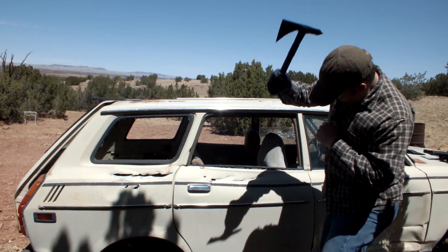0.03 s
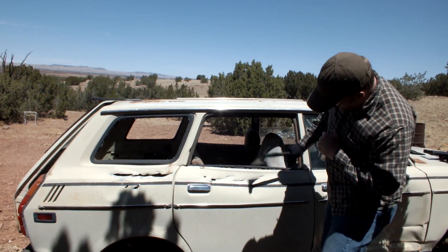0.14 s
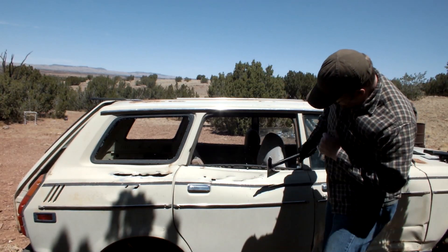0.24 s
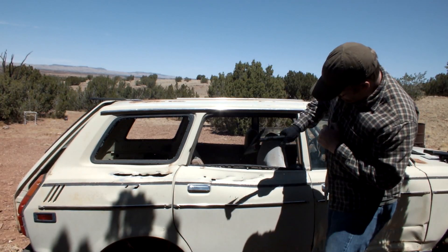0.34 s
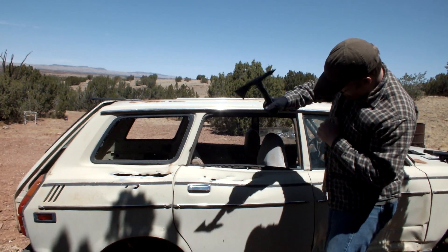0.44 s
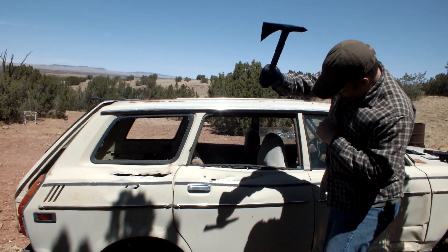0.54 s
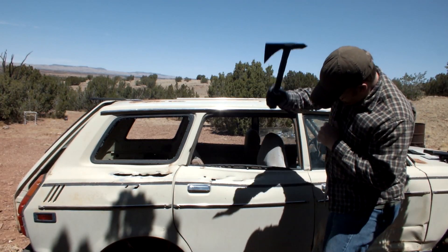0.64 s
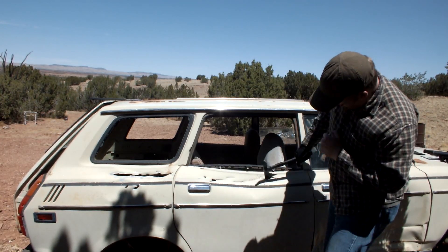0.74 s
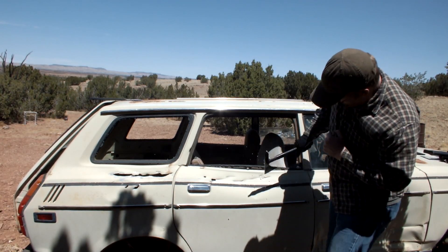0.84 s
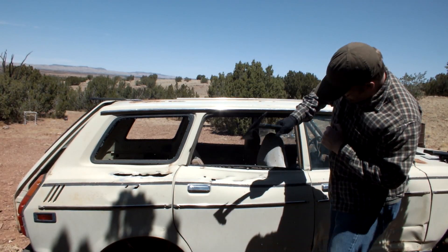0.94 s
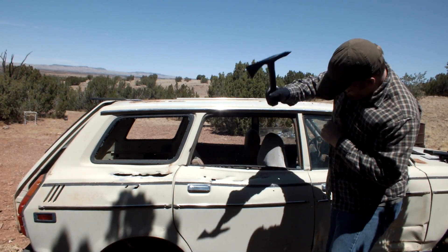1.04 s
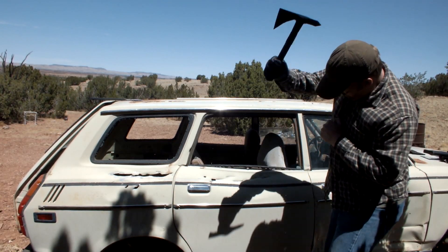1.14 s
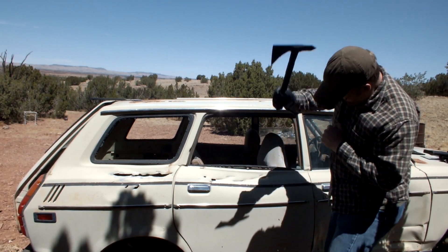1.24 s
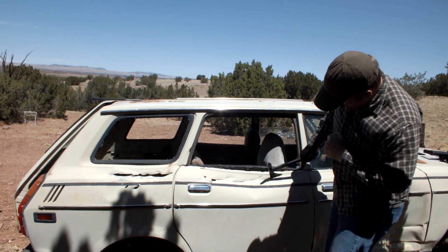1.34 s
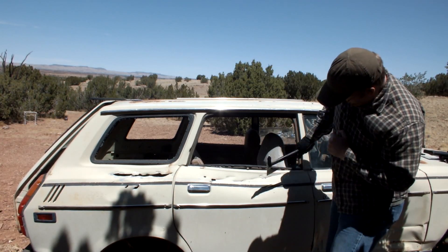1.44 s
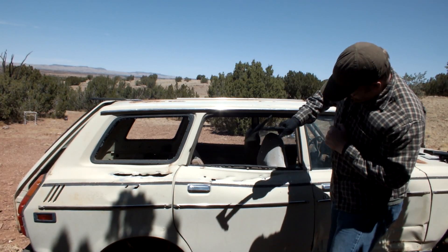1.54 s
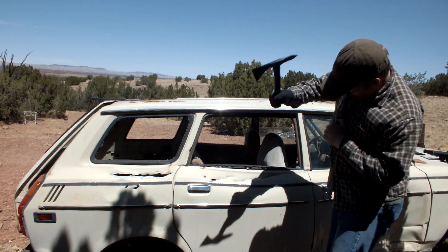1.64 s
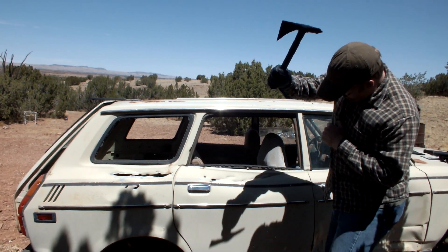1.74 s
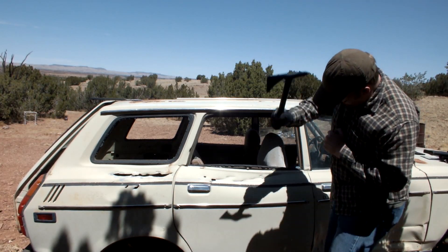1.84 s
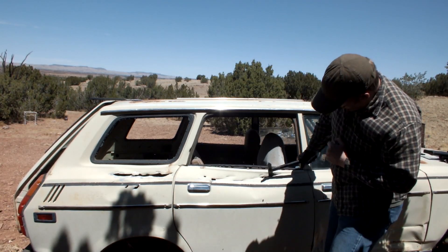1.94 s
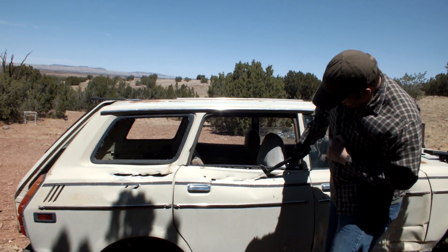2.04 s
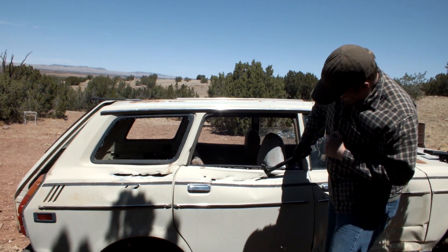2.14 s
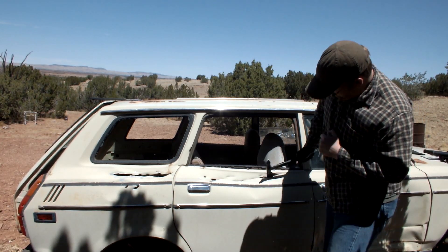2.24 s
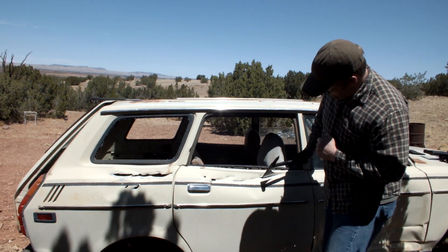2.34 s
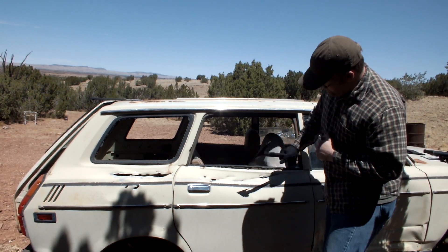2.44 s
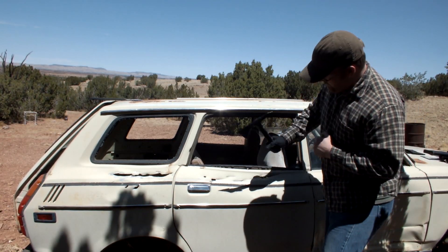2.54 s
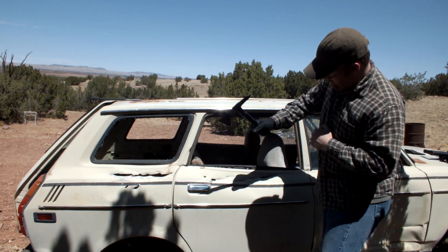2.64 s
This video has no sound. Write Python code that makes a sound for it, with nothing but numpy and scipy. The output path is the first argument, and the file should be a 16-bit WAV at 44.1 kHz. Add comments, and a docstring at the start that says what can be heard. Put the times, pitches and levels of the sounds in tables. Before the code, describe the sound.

An axe hits a car's broken side window four times at a steady pace, each a sharp crack and hollow sheet-metal rattle, with glass snapping and crunching between blows; close microphone, quiet open outdoors.

```python
"""A tomahawk chops four times into the broken side window of an old car, outdoors.
Each blow is a coloured noise crack and a sine thump; banded noise rattles and sine modes ring the hollow door.
Glass snaps as clicks with treble modes, cracks and crunches as short grains and tinkles as beating sines.
Soft thuds and short rings are the blade bumping the window frame; faint coloured noise is the still air.
"""
import sys
import numpy as np
from scipy import signal
from scipy.fft import rfft, irfft
from scipy.io import wavfile
from scipy.ndimage import uniform_filter1d

SR = 44100
rng = np.random.default_rng(int(sys.argv[2]) if len(sys.argv) > 2 else 0)


def persist_wave(psi):
    """Save psi, clipped to +-1, as 16-bit WAV."""
    counts = np.round(np.clip(psi, -1, 1) * 32767).astype(np.int16)
    wavfile.write(sys.argv[1], SR, np.atleast_2d(counts).T)


N = 119070

# axe blows and how the door answers each: t/s, crack level/dB, door level/dB, crack treble/dB, thump f/Hz,
# thump level/dB, favoured door f/Hz, level recovery/s, door ring length (factor)
BLOW_TABLE = [(0.2131, 1, -1, -1, 183, -13.5, 260, 0.1, 0.71),
              (0.7964, -1.5, -1, 2, 420, -12.5, 365, 0.095, 0.97),
              (1.3988, 0.5, -2, -2, 400, -14.5, 74, 0.073, 0.99),
              (1.9762, -2, -1, 5, 764, -16, 192, 0.083, 0.99)]
# colour of breaking glass: f/Hz, level/dB
GLASS_COLOUR = [(80, -24), (250, -15.5), (600, -2), (1100, 1), (2200, 1), (4000, -3.5), (5500, -10.5),
                (8500, -15), (12000, -26.5), (15000, -26.5)]

BODY_HZ, TREBLE_HZ = 765, 4800  # corners of the tone shelves
GLASS_TAIL_DB, GLASS_TAIL_T60_S = -25, 0.45  # weaker scatter behind every glass contact


def undb(db):
    """Turn decibels into an amplitude factor."""
    return 10 ** (np.asarray(db) / 20)


def unit(x):
    """Scale to an energy of one, averaged over the channels."""
    return x / np.sqrt(np.mean(np.sum(x ** 2, axis=-1)) + 1e-18)


def freqs():
    """Frequencies in Hz of the full-length spectrum, kept at or above 1 Hz."""
    return np.maximum(np.arange(N // 2 + 1) * SR / N, 1)


def curve(points):
    """Draw a level in dB at every frequency, through points on a log frequency axis."""
    hz, db = np.array(points).T
    return np.interp(np.log(freqs()), np.log(hz), db)


def treble():
    """Shelf from 0 in the bass to 1 in the treble."""
    return 1 / (1 + (TREBLE_HZ / freqs()) ** 4)


def colour(x, db):
    """Filter with the given dB curve, causal (minimum phase) and of unit energy."""
    cepstrum = irfft(np.log(undb(db)), N)
    # folding the cepstrum forward in time makes the filter causal
    cepstrum[1:N // 2] *= 2
    cepstrum[N // 2 + 1:] = 0
    impulse = irfft(np.exp(rfft(cepstrum)), N)
    impulse = unit(impulse[:N // 16])
    return signal.fftconvolve(x, impulse[None], axes=-1)[:, :x.shape[-1]]


def noise(n):
    """Stereo noise: alike in the bass, more and more unrelated in the treble."""
    wide_hz = 4100
    f = np.arange(n // 2 + 1) * SR / n
    mid, side = rfft(rng.standard_normal((2, n)))
    spread = (f / wide_hz) ** 1.3
    side_share = .5 * spread / (1 + spread)
    opposite = np.array([[1], [-1]])
    return irfft(mid * np.sqrt(1 - side_share) + side * np.sqrt(side_share) * opposite, n)


def clock():
    """Time axis of one event, in seconds."""
    return np.arange(2 ** 15) / SR


def fade(t, t60):
    """Exponential decay that falls 60 dB in t60 seconds, flat before t = 0."""
    return np.exp(-np.log(1000) * np.maximum(t, 0) / max(t60, 1e-3))


def add(out, s, x):
    """Mix x in at s seconds."""
    i = max(int(s * SR), 0)
    out[:, i:i + x.shape[-1]] += x[..., :max(N - i, 0)]


def contact(sharp, t60, tail_db, tail_t60):
    """A hard click, its quick scatter and a weaker tail from the car's cabin."""
    t = clock()
    envelope = fade(t, t60) + undb(tail_db) * fade(t, tail_t60)
    x = unit(noise(len(t)) * envelope)
    x[:, 0] += sharp
    return unit(x)


def blows():
    """The axe lands: a crack and a short thump of the struck spot, then the door rattles and rings."""
    # colour of the crack of the blade on the sill: f/Hz, level/dB
    crack_colour = [(40, -32), (140, 0), (400, 0.5), (850, 1), (1600, 0.5), (2600, -5), (4200, -3.5),
                    (5500, -13), (9000, -19.5), (15000, -33)]
    out, t = np.zeros((2, N)), clock()
    for (s, crack_db, door_db, treble_db, thump_hz, thump_db,
         favoured_hz, recovery_s, ring) in BLOW_TABLE:
        click = contact(sharp=0.57, t60=0.014, tail_db=-17, tail_t60=0.12)
        crack = unit(colour(click, curve(crack_colour) + treble_db * treble()))
        thump = undb(thump_db) * fade(t, t60=0.12) * np.sin(2 * np.pi * thump_hz * t)
        answer = rattle() + door(favoured_hz, recovery_s, ring)
        add(out, s, undb(17 + crack_db) * crack + thump + undb(door_db) * answer)
    return out


def rattle():
    """Door and loose glass chatter unevenly, hold briefly, then die away band by band."""
    # overlapping noise bands of the rattle: f/Hz, level/dB, hold/s, t60/s
    bands = [(42, -44.5, 0.11, 0.6), (101, -35, 0.12, 0.7), (204, -35.5, 0.17, 0.44),
             (336, -29.5, 0.15, 0.32), (433, -26, 0.092, 0.4), (820, -28.5, 0.038, 0.46),
             (1400, -31, 0.04, 0.67), (2410, -33.5, 0.048, 0.6), (4440, -44.5, 0.08, 0.51),
             (5200, -45.5, 0.054, 0.61), (9500, -47.5, 0.032, 0.43), (14800, -60, 0.03, .5)]
    rough_db, rise_cycles = 2.2, 0.48  # RMS of the level flutter; time constant of the rise
    t = clock()
    log_f = np.log(np.maximum(np.arange(len(t) // 2 + 1) * SR / len(t), 1))
    log_centres = np.log([row[0] for row in bands])
    hiss = rfft(noise(len(t)))
    flutter = uniform_filter1d(rng.standard_normal(len(t)), size=160)
    chatter = undb(rough_db * flutter / flutter.std())
    out = 0
    for weights, (hz, db, hold, t60) in zip(np.eye(len(bands)), bands):
        band = irfft(hiss * np.interp(log_f, log_centres, weights))
        rise = 1 - np.exp(-t * hz / rise_cycles)
        envelope = rise * fade(t - hold, t60)
        if hz > BODY_HZ:
            envelope = envelope * chatter
        out = out + band / band.std() * undb(db) * envelope
    return out


def door(favoured_hz, recovery_s, ring):
    """Sheet-metal modes, some favoured, rise as the recorder's gain recovers, then ring out, scaled by ring."""
    # modes of the door before detuning, favouring and ring scaling: f/Hz, level/dB, t60/s
    modes = [(67.56, -24, 0.71), (167.2, -27, 0.58), (224.3, -25.5, 0.48), (245, -25, 0.55),
             (276.7, -26, 0.48), (343, -28.5, 0.26), (416, -21.5, 0.21), (445, -29, 0.36), (522, -27, 0.21),
             (630, -36.5, 0.2), (750, -32, 0.35), (938, -34.5, 0.34)]
    favour_db, favour_octaves = 2.5, 0.17  # the struck spot favours modes near favoured_hz
    start = .18  # share of the full level present at the blow
    t = clock()
    recovery = np.minimum(start + (1 - start) * (t / recovery_s) ** 2, 1)
    out = 0
    for hz, db, t60 in modes:
        detune, phase = rng.standard_normal(2)
        octaves_off = np.log2(hz / favoured_hz)
        favour = favour_db * np.exp(-.5 * (octaves_off / favour_octaves) ** 2)
        tone = np.sin(2 * np.pi * (hz * (1 + 0.00895 * detune) * t + phase))
        out = out + undb(db + favour) * fade(t - recovery_s, ring * t60) * tone
    return recovery * out


def snaps():
    """Pieces of glass break off or land: a click and splinter modes, each with its own ring."""
    # glass snapping: t/s, level/dB, ring f/Hz, ring boost/dB, body shelf/dB, treble shelf/dB, t60/s
    pieces = [(.014, -18.5, 1260, 3, 8, 17.5, 0.088), (0.0973, -23, 2540, 3, -1, 8.5, 0.11),
              (0.2232, -13.5, 1500, 19, -1, 30, 0.017), (0.2339, 1, 1450, 5, -6, -11, 0.029),
              (0.3615, -8, 1200, 5, 20, -3.5, 0.071), (0.415, -2, 3180, 6, -1, -1.5, 0.069),
              (0.53, -4, 2570, 1.5, -6, 4.5, 0.061), (0.6636, 0.5, 1320, 3, 1, 2.5, 0.092),
              (.672, -11, 3320, 5, 7, -9, 0.17), (.772, -3, 1300, 6.5, -5, 4.5, 0.073),
              (0.982, -15, 2320, 4, -23, -12, 0.061), (1.129, -14.5, 2240, 12, -11, -7.5, 0.063),
              (1.29, -12.5, 3750, 3, 3, 10, 0.1), (1.3109, -8, 1930, 2, -3, 0, 0.13),
              (1.3373, -6, 1870, 1, 6, -1, 0.064), (1.586, -5.5, 1370, 6, -5, 15, 0.032),
              (1.643, -10, 3700, 5.5, -15, 1, 0.032), (1.724, -15.5, 3350, 13, -44, 12, 0.11),
              (1.782, -9, 3700, 1, -20, 15, 0.044), (1.8235, -9, 4070, 7.5, -4.5, 3.5, 0.064),
              (1.866, -19.5, 4170, 0, 2, 14.5, .05), (1.88, -16.5, 3800, 8, 1, 15, 0.017),
              (1.893, -19.5, 3500, 0, -12, 9, 0.024), (1.936, -2, 1060, 5.5, -11, 2, 0.053),
              (1.986, 1, 1850, 6.5, 4, -2.5, 0.044), (2.169, -13.5, 4100, 6, 14, -6.5, 0.072),
              (2.298, -13.5, 1520, 3, 17, -18, 0.027), (2.356, -16, 4170, 3, 1, 10.5, 0.068),
              (2.418, -7.5, 3480, 2.5, -22, 12.5, 0.06), (2.443, -8, 2260, 2.5, -22, 9, 0.096),
              (2.666, -14.5, 2960, 5, 8.5, 19, 0.071)]
    ring_octaves = .33
    out, f, glass = np.zeros((2, N)), freqs(), curve(GLASS_COLOUR)
    body = 1 / (1 + (f / BODY_HZ) ** 4)
    for s, db, hz, ring_db, body_db, treble_db, t60 in pieces:
        click = contact(0.41, t60, GLASS_TAIL_DB, GLASS_TAIL_T60_S)[:, :SR // 5]
        x = click + undb(-7.5) * splinters(count=14)
        ring = np.exp(-.5 * (np.log2(f / hz) / ring_octaves) ** 2)
        tone = glass + ring_db * ring + body_db * body + treble_db * treble()
        add(out, s, undb(10 + db) * unit(colour(x, tone)))
    return out


def splinters(count):
    """Short, unrelated glass modes, drawn evenly from 1.2 to 13 kHz, each uneven between left and right."""
    t = clock()[:SR // 5]
    hz = rng.uniform(1200, 13000, (count, 1))
    rings = np.sin(2 * np.pi * hz * t) * fade(t, t60=.08)
    gains = 1 + 0.84 * rng.standard_normal((2, count))
    return unit(gains @ rings)


def tinkles():
    """Loose shards ring, each as three close modes that beat."""
    # ringing shards: t/s, centre f/Hz, level/dB, t60/s
    shards = [(.29, 7650, -44, 0.58), (1.129, 2320, -34.5, 0.063), (1.586, 1500, -31, 0.072),
              (.415, 3160, -28, 0.058), (2.238, 6880, -40, 0.13), (2.28, 7700, -47, 0.58),
              (2.396, 7000, -41, 0.16), (2.443, 2000, -40, 0.19), (2.444, 2510, -30, .13),
              (2.443, 2920, -35.5, 0.2), (2.444, 3560, -33, 0.11)]
    split = 0.0043  # spread of the close modes, as a share of the pitch
    out, t = np.zeros((2, N)), clock()
    for s, hz, db, t60 in shards:
        cluster = hz * (1 + split * rng.standard_normal((3, 1)))
        beating = np.sin(2 * np.pi * cluster * t).sum(axis=0) / 2
        add(out, s, undb(db) * fade(t, t60) * beating)
    return out


def crunches():
    """Short glass cracks and crunches as scattered grains; loose glass and faint ticking after each blow."""
    # short glass cracks and crunches, some single small snaps, some dense runs: t/s, length/s, level/dB
    bursts = [(0, 0.032, -41.5), (0.148, 0.0059, -41), (0.319, 0.01, -26), (0.493, 0.019, -36.5),
              (0.737, 0.0036, -33.5), (0.901, 0.0076, -29.5), (1.058, 0.021, -42), (1.228, 0.0077, -27),
              (1.238, 0.018, -26), (1.316, .006, -24), (1.372, 0.0057, -27.5), (1.681, 0.012, -36.5),
              (1.717, 0.0033, -41), (1.742, 0.021, -37.5), (1.777, 0.0049, -30), (2.05, 0.0053, -27.5),
              (2.13, 0.011, -33), (2.261, 0.018, -36.5), (2.279, 0.04, -34), (2.404, 0.0061, -37),
              (2.519, 0.016, -45.5), (2.556, 0.0099, -45.5)]
    out, t = np.zeros((2, N)), clock()
    for s, length, db in bursts:
        clicks = grains(int(length * SR) + 1, rate=1700)
        # longer bursts carry more energy
        add(out, s, undb(db) * np.sqrt(length * SR) * crackle(clicks))
    for blow in BLOW_TABLE:
        loose_glass = grains(len(t), rate=89) * fade(t, t60=0.33)
        add(out, blow[0], undb(-2) * crackle(loose_glass))
        # faint random ticking texture for half a second after each blow
        faint_ticks = grains(SR // 2, rate=91)
        add(out, blow[0], undb(-13) * crackle(faint_ticks))
    return colour(out, curve(GLASS_COLOUR))


def grains(n, rate):
    """Sparse random clicks of uneven size, on average rate per second."""
    return unit((rng.random(n) < rate / SR) * rng.standard_normal(n))


def crackle(clicks):
    """Clicks in one patch of glass, which scatters them in its own way."""
    scatter = contact(0.26, 0.034, GLASS_TAIL_DB, GLASS_TAIL_T60_S)
    return unit(signal.fftconvolve(clicks[None], scatter, axes=-1))


def bumps():
    """The blade bumps the window frame on its way out: a dull noise thud and a short ring of modes."""
    # soft contacts: t/s, ring level/dB, thud level/dB
    touches = [(.414, -19, 1.5), (.664, -13.5, -9), (2.282, -5, 1)]
    # modes of the window frame: f/Hz, level/dB, t60/s
    frame_modes = [(248, -26.5, 0.2), (411.6, -11, 0.12), (733, -22, 0.15)]
    # colour of the thud: f/Hz, level/dB
    thud_colour = [(60, -27), (280, -2), (480, 0), (1100, -10.5), (2500, -13), (8000, -48)]
    out, t = np.zeros((2, N)), clock()
    rise = 1 - np.exp(-t / 0.0084)
    for s, ring_db, thud_db in touches:
        ring = 0
        for hz, db, t60 in frame_modes:
            ring = ring + undb(db) * fade(t, t60) * np.sin(2 * np.pi * (hz * t + rng.random()))
        burst = noise(len(t)) * rise * fade(t, t60=0.16)
        thud = unit(colour(burst, curve(thud_colour)))
        add(out, s, undb(ring_db) * rise * ring + undb(thud_db) * thud)
    return out


def air():
    """Still air: faint steady noise, weighted to the bass."""
    # colour of the air: f/Hz, level/dB
    air_colour = [(30, -21), (70, 2), (140, 2.5), (300, -4), (700, -6.5), (3000, -15), (10000, -28.5)]
    return undb(-54) * colour(noise(N), curve(air_colour))


def scene():
    """Mix all sources; the left side comes slightly later and softer than the right."""
    left_lag_s, right_db = .000018, 2.8  # right_db: level of right over left
    x = blows() + bumps() + snaps() + tinkles() + crunches() + air()
    left = irfft(rfft(x[0]) * np.exp(-2j * np.pi * freqs() * left_lag_s), N)
    return np.array([left * undb(-right_db / 2), x[1] * undb(right_db / 2)])


def record(dry):
    """The recorder rounds the loudest peaks and cuts the top."""
    ceiling, top_hz = .88, 15200
    soft = dry / (1 + (dry / ceiling) ** 4) ** .25
    lowpass = signal.ellip(8, .2, 85, top_hz, fs=SR, output="sos")
    return signal.sosfilt(lowpass, soft)


dry = scene()
out = record(dry)
persist_wave(out)
```